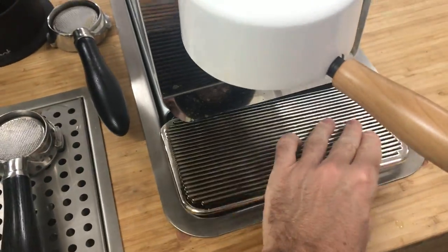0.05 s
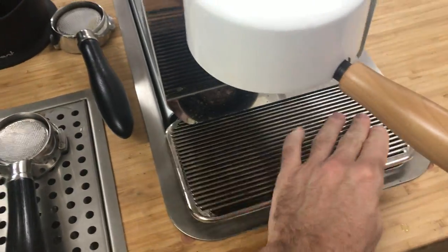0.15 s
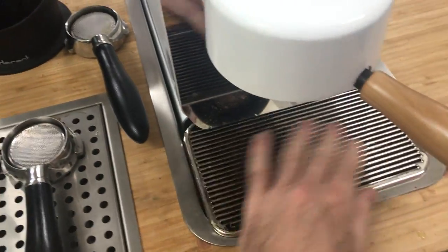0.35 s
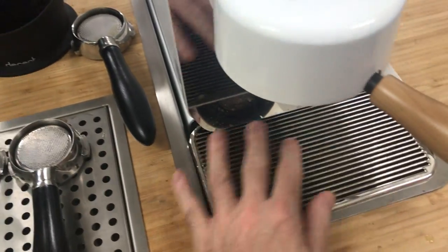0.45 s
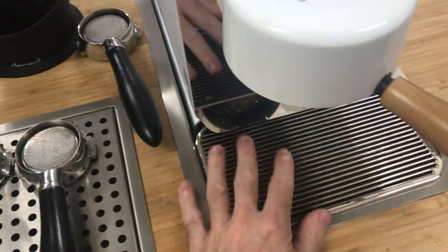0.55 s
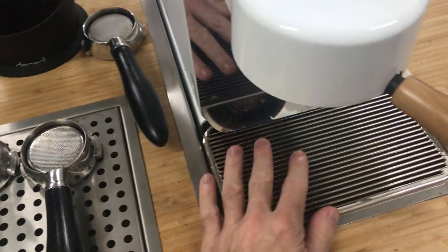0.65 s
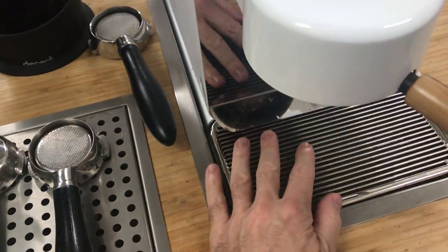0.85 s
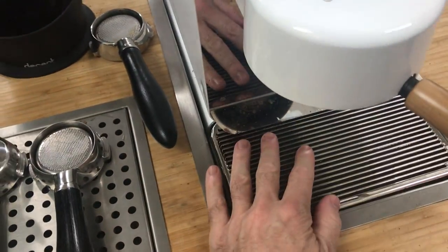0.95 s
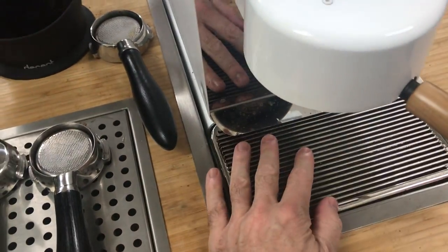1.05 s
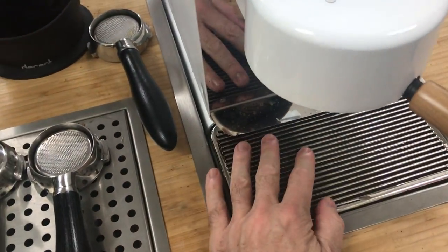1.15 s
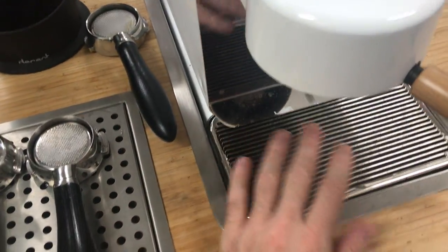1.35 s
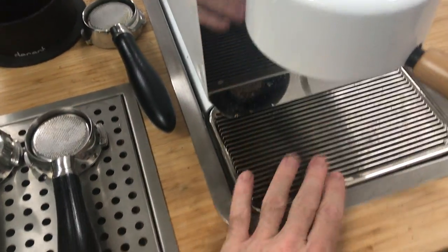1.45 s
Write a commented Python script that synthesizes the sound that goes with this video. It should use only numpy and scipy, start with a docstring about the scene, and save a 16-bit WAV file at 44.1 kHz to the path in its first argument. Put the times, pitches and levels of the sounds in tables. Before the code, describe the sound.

A slotted steel tray clatters, scrapes and clanks into its metal bracket.

```python
"""Steel drip tray pushed home

Close up at a kitchen counter, a slotted steel tray goes into its bracket. Its edge taps the frame,
it drops in with a clatter, scrapes and squeaks to a stop, and is pressed home with two ticks and
a clank. Every contact rings the same steel modes; a small room and a low rumble surround it."""
import sys
import numpy as np
from scipy import signal
from scipy.fft import irfft
from scipy.io import wavfile
from scipy.ndimage import uniform_filter1d

SR = 44100
rng = np.random.default_rng(int(sys.argv[2]) if len(sys.argv) > 2 else 0)


def wav_out(sig):
    """Save sig, one row per channel (or a flat mono array), as 16-bit PCM at SR to the path in sys.argv[1]."""
    wavfile.write(sys.argv[1], SR, np.round(np.clip(np.atleast_2d(sig).T, -1, 1) * 32767).astype(np.int16))


N = 66150
T = np.arange(N) / SR
BUILD_S = 0.0034  # a ring takes a moment to spread

# The tray's broad spectrum, by place of contact. Each row: frequency in Hz, relative density in dB.
TRAY_SPECTRA = {"edge": [(450, -16), (1100, 2.5), (2000, -2.5), (3500, -3.5), (6000, -8), (9000, -5.5),
                (15000, -10.5)], "drop": [(450, -1), (700, -16), (1000, 2.5), (2000, 0.5), (6000, -24),
                (10000, 5.5), (15000, 3.5)], "slide": [(450, -5), (700, -22), (1000, 3.5), (1800, -2),
                (3500, 4.5), (7000, 2.5), (15000, 4.5)], "catch": [(450, -7.5), (1100, 8.5), (1800, -0.5),
                (2800, 15), (5000, -28), (9000, -3.5), (15000, -8)], "seat": [(450, -6), (700, -16),
                (1000, 6.5), (1800, -1), (3500, 4), (5000, 1.5), (5900, 7.5), (7500, 4), (11000, 6),
                (15000, 4.5)]}
# The tray sliding in. Each row: time in seconds, level in dB, treble gain in dB.
SLIDE_STROKE = [(0.362, -20.5, -1), (0.41, -36, 18.5), (0.435, -36.5, 19), (0.481, -31, 12.5),
                (0.506, -26.5, 3), (0.56, -28, 1.5), (0.63, -31.5, 3.5), (0.66, -34.5, -4),
                (0.689, -33.5, -8), (0.711, -42.5, -25.5), (0.749, -49, -23), (0.842, -57.5, -3),
                (0.89, -42.5, -27), (0.946, -32.5, -17)]


def from_db(db):
    """Decibels to gain."""
    return 10 ** (np.asarray(db) / 20)


def unit(x):
    """Scale to an energy of one."""
    return x / np.sqrt(np.sum(x ** 2) + 1e-20)


def at_hz(points, hz):
    """Read a table on a log-frequency axis."""
    frequencies, values = np.transpose(points)
    return np.interp(np.log(hz), np.log(frequencies), values)


def through(x, response):
    """Play a signal through an impulse response."""
    return signal.fftconvolve(x, response)[:N]


def wavering(hz, linewidth_hz=8.2):
    """A sine whose phase drifts as the contact shifts."""
    drift = np.cumsum(rng.standard_normal(N)) * np.sqrt(2 * np.pi * linewidth_hz / SR)
    return np.sin(2 * np.pi * (hz * T + rng.random()) + drift)


def scattered_tones(mean_gap_hz=22.07, cluster_hz=180, swing_db=5.5):
    """Two sets of modes at random pitches; a point of contact favours some clusters over others."""
    present = rng.random((2, N)) < SR / (2 * N) / mean_gap_hz
    width = int(cluster_hz * 2 * N / SR)
    clusters = np.tanh(uniform_filter1d(rng.standard_normal(N), width) * np.sqrt(width))
    lines = present * from_db(swing_db * clusters) * np.exp(2j * np.pi * rng.random((2, N)))
    return irfft(lines, 2 * N)[:, :N + SR // 10]  # extra length lets filters settle


def band_noise(spectrum, t60s=None, modal=False):
    """Third-octave bands of noise or scattered modes, steady or each dying at its own rate."""
    raw = scattered_tones() if modal else rng.standard_normal((2, N + SR // 10))
    edges = np.geomspace(28, 17500, 29)
    out = 0
    for k, (low, high) in enumerate(zip(edges, edges[1:])):
        hz = np.sqrt(low * high)
        bandpass = signal.butter(2, [low, high], "band", fs=SR, output="sos")
        band = signal.sosfilt(bandpass, raw[k % 2])[-N:]
        if t60s is not None:
            band = band * from_db(-60 * T / at_hz(t60s, hz))
        out = out + unit(band) * np.sqrt(high - low) * from_db(at_hz(spectrum, hz))
    return unit(out)


def background(level_db=-47):
    """The kitchen's room tone: a steady low rumble with faint hiss."""
    # Each row: frequency in Hz, relative density in dB.
    rumble_spectrum = [(25, -28.5), (45, -3.5), (85, -8.5), (135, 2.5), (200, -9.5), (290, -9), (450, -19),
                       (1100, -18), (2200, -27.5), (4500, -35.5), (9000, -44), (16000, -45.5)]
    return from_db(level_db) * np.sqrt(N) * band_noise(rumble_spectrum)


def room(near, level_db=-15):
    """The small room's reflections, which linger longest around 4 kHz."""
    # Each row: frequency in Hz, seconds to die away by 60 dB.
    reverb_times = [(150, 0.42), (1000, 0.63), (4000, 0.95), (9000, 0.52), (15000, .36)]
    colour = [(200, 15.0), (4400, -8.5), (8700, -6.0), (13000, -5.0)]  # Hz, dB
    return from_db(level_db) * through(near, band_noise(colour, reverb_times))


def frame_ring():
    """The dull, wavering ring of the frame and counter under the tray."""
    # Each row: frequency in Hz, level in dB, seconds to die away by 60 dB.
    frame_modes = [(182, -10.5, 0.1105), (235.7, -9, 0.14), (297, -6.5, 0.24), (371.1, -8.5, 0.23),
                   (575.6, -10, 0.048)]
    onset = 1 - np.exp(-T / BUILD_S)
    return sum(from_db(db) * unit(wavering(hz) * from_db(-60 * T / t60) * onset)
               for hz, db, t60 in frame_modes)


def counter_rumble(gain_db=-31, follow=0.58):
    """The slide shakes the frame and the counter under it."""
    times, db, _ = np.transpose(SLIDE_STROKE)
    sliding = (T >= times[0]) * (T <= times[-1])
    force = rng.standard_normal(N) * from_db(gain_db + follow * np.interp(T, times, db))
    return through(force * sliding, frame_ring())


def tray_ring(place, scatter_db=1.5):
    """The tray touched at one place: clear modes over a crowd of weak ones, never twice alike."""
    # The clear modes. One entry each: frequency in Hz, seconds to fall 60 dB, level in dB by place.
    mode_hz = [856, 1170, 1491, 2240, 2367, 2912, 3781, 4097, 4284, 4382, 4405, 5481, 5890, 6780, 6859,
               6917, 7342, 8640, 8825, 11304, 12251, 12740, 13166, 14769]
    mode_t60 = [0.11, 0.1, 0.052, 0.28, 0.098, 0.25, 0.097, 0.14, 0.1, 0.44, 0.19, 0.14, 0.078, 0.052,
                0.065, 0.11, 0.13, 0.11, 0.12, 0.091, 0.16, 0.14, .11, .11]
    mode_db = {"edge": [-27, -19, -35, -38, -15.5, -16, -34.5, -2.5, -31.5, -34.5, 1, -9, -25.5, -33, -10,
               -17, -15.5, -44.5, -40.5, -22.5, -37.5, -36, -40.5, -35], "drop": [-17, -33, -15, -21, -22,
               -27.5, -15, -10, -20, -23, -13, -13.5, -40.5, -17, -15, -16.5, -21, -11, -18.5, -19, -14,
               -19, -19, -11.5], "slide": [-23.5, -18.5, -21, -19.5, -14.5, -18.5, -13.5, -15.5, -20, -20,
               -15.5, -20.5, -27, -25, -13.5, -16.5, -16, -28, -19.5, -17.5, -30, -18, -28.5, -29], "catch":
               [-15, -11.5, -12, -23, -30, -25, -13, -29, -45, -33, -24, -20.5, -30, -6, -6, -30.5, -22,
               -17.5, -35, -41, -24, -34.5, -30, -23], "seat": [-21, -21, -30, -18, -17, -41, -6, -20, -17,
               -19, -28, -12, -9.5, -21, -19, -21, -12.5, -6.5, -38.5, -36, -33, -11, -25, -33.5]}
    # The crowd's level in dB, by place.
    crowd_db = {"edge": -8, "drop": -6, "slide": -2.5, "catch": -0.5, "seat": -3.5}
    # The crowd's decay. Each row: frequency in Hz, seconds to fall 60 dB.
    crowd_t60 = [(150, .25), (1000, 0.21), (4000, 0.37), (9000, .13), (15000, 0.13)]
    crowd = band_noise(TRAY_SPECTRA[place], crowd_t60, modal=True)
    low_cut = signal.butter(2, 166, "high", fs=SR, output="sos")  # the tray radiates little bass
    ring = from_db(crowd_db[place]) * signal.sosfilt(low_cut, crowd)
    for hz, t60, db in zip(mode_hz, mode_t60, mode_db[place]):
        mode = wavering(hz) * from_db(-60 * T / t60)
        ring = ring + from_db(db + scatter_db * rng.standard_normal()) * unit(mode)
    return ring * (1 - .5 * np.exp(-T / BUILD_S))


def scrape(stroke, place, slips_per_s=330, spread_db=8, treble_hz=7040):
    """Steel sticks and slips in quick, uneven steps that ring the tray; the stroke sets their tone."""
    times, db, treble_db = np.transpose(stroke)
    slip_rate = np.repeat(rng.exponential(slips_per_s / SR, N), SR // 1000)[:N]  # new each millisecond
    slipping = np.diff(np.floor(np.cumsum(slip_rate)), prepend=0) > 0
    slips = slipping * from_db(spread_db * rng.uniform(-1.3, 1, N)) * rng.choice([-1, 1], N)
    slips = unit(slips) * np.sqrt(N)
    dull = signal.sosfilt(signal.butter(1, treble_hz, fs=SR, output="sos"), slips)
    treble = (slips - dull) * from_db(np.interp(T, times, treble_db))
    force = (dull + treble) * from_db(np.interp(T, times, db))
    moving = (T >= times[0]) * (T <= times[-1])
    return through(force * moving, tray_ring(place))


def scrapes():
    """The tray shifts faintly under the hand, brushes the frame with its edge, then slides in."""
    # Each row of both strokes: time in seconds, level in dB, treble gain in dB.
    shift = [(0, -38, -23), (0.035, -65, -20)]
    brush = [(0.055, -66, 1.5), (0.105, -73, -2), (0.128, -61, -12.5), (0.145, -96.5, -14),
             (0.185, -59, -17.5), (0.22, -47.5, -6.5), (0.30, -48, -20.5), (0.35, -57, -6)]
    return scrape(shift, "slide") + scrape(SLIDE_STROKE, "slide") + scrape(brush, "edge")


def squeaks(swell_s=.004, t60_s=0.061):
    """Friction feeds one mode at a time, which swells, holds and rings out."""
    # Each row: start of the hold in seconds, its length in seconds, pitch in Hz, level in dB.
    squeals = [(0.379, 0.045, 12251, -26), (0.382, 0.0076, 4097, -24.5), (0.421, 0.05, 3766, -31),
               (0.525, 0.0057, 3790, -32.5), (0.553, 0.049, 3775, -37), (0.61, 0.14, 5540, -52.5),
               (0.877, 0.013, 5481, -48.5), (0.923, 0.017, 3781, -41)]
    out = 0
    for start, hold, hz, db in squeals:
        swell = np.exp(np.minimum(T - start, 0) / swell_s)
        release = from_db(-60 * np.maximum(T - start - hold, 0) / t60_s)
        out = out + from_db(db) * swell * release * np.sqrt(2) * wavering(hz)
    return out


def knocks(clash_db=-10.5, clash_t60_s=0.015):
    """Steel strikes steel: a short clash, the tray's ring damped by hand and frame, and a thud."""
    # Each row: start in seconds, strength in dB, extra damping in dB per second,
    # relative level of the frame's thud in dB, place of contact.
    strikes = [(0.2239, 5, 4, -23, "edge"), (0.3599, 11, 200.5, -16, "slide"),
               (0.3616, 4.5, 346.5, -8.5, "catch"), (0.3776, 0.5, 251, -16, "drop"),
               (0.3821, 9.5, 130.5, -43, "drop"), (0.3962, 10, 150.5, -25, "drop"),
               (0.4178, 13.5, 553.5, -21, "drop"), (0.4200, 7.5, 402, -19, "catch"),
               (0.4440, 0.5, 49, -13, "edge"), (0.454, 7, 149.5, -28.5, "slide"),
               (0.4630, 8.5, 252.5, -16.5, "slide"), (0.474, 8, 301.5, -20.5, "slide"),
               (0.4865, 5.5, 250, -20, "slide"), (0.5133, 4, 98, -13.5, "slide"),
               (0.6744, -11, 100, -13.5, "catch"), (0.8981, -6, 602.5, -37, "slide"),
               (0.9209, -2.5, 447, -20, "catch"), (0.9511, 10, 13, -29, "seat"),
               (0.9714, 3.5, 149.5, -13.5, "slide")]
    out, thud = np.zeros(N), frame_ring()
    burst = from_db(-60 * T / clash_t60_s) * (1 - np.exp(-T / BUILD_S))
    clashes = {place: unit(band_noise(spectrum) * burst) for place, spectrum in TRAY_SPECTRA.items()}
    for start_s, db, damping, thud_db, place in strikes:
        start = int(start_s * SR)
        ring = tray_ring(place) * from_db(-damping * T)
        knock = ring + from_db(clash_db) * clashes[place] + from_db(thud_db) * thud
        out[start:] += from_db(db) * knock[:N - start]
    return out


def scene():
    """Tray and counter close by, the room and its rumble behind, in mono."""
    near = knocks() + scrapes() + squeaks() + counter_rumble()
    return (near + room(near) + background())[None]


def record(dry):
    """The microphone drops the deepest bass; the top is cut steeply."""
    low_cut = signal.butter(6, 40, "high", fs=SR, output="sos")
    high_cut = signal.ellip(10, .2, 70, 15600, fs=SR, output="sos")
    return signal.sosfilt(high_cut, signal.sosfilt(low_cut, dry))


dry = scene()
out = record(dry)
wav_out(out)
```